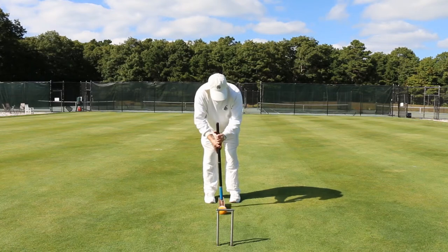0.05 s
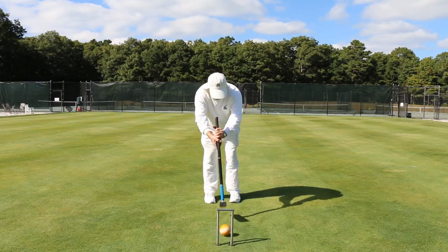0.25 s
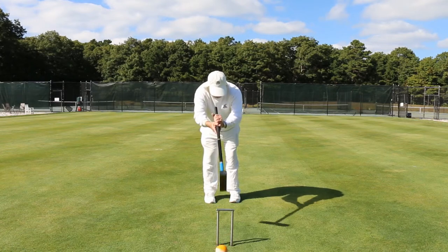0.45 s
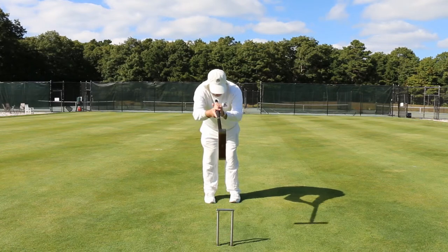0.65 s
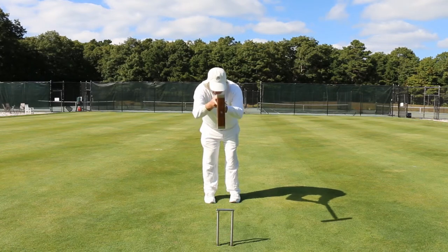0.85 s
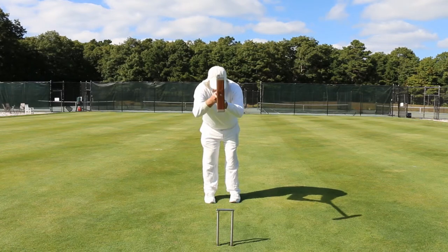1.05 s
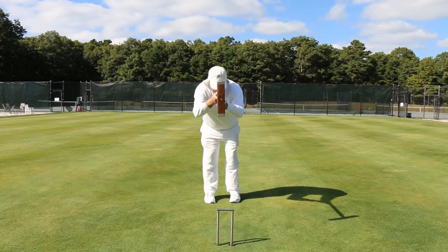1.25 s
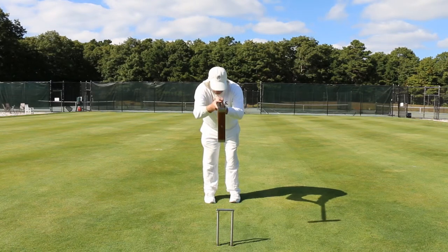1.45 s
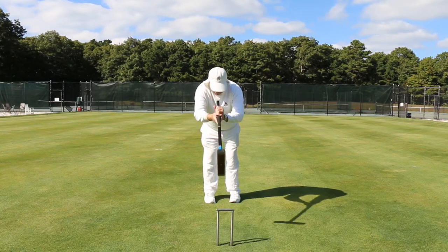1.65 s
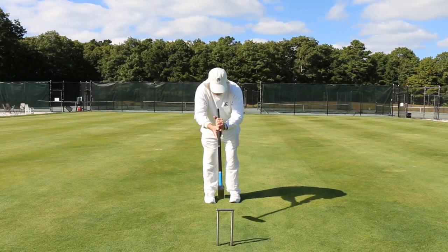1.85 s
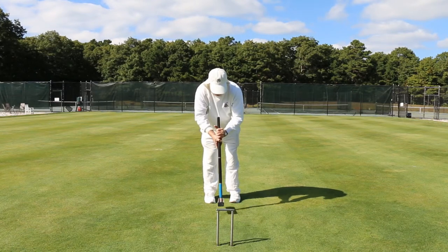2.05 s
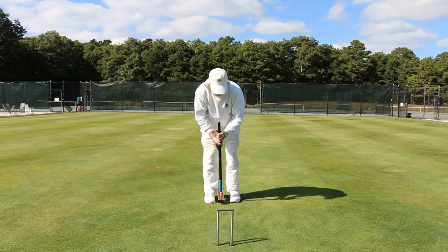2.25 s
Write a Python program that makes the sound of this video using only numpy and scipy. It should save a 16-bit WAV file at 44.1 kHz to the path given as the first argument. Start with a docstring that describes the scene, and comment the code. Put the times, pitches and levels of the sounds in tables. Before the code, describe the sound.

A faint bird whistle, then one abrupt, distorted wooden clack of mallet against ball; afterwards only a soft outdoor wash, small husky bird notes to the right, microphone hiss and a thin high electric whine.

```python
"""An open lawn: a wooden mallet strikes a hard ball a few metres from a camera whose input overloads.
Decaying wood modes, a crack of noise, a ground reflection and a dull echo make the knock.
Far traffic and breeze in trees are a soft wash of shaped noise. A bird whistles a pure, wavering tone;
another chatters to the right in short falling notes, husky with noise, amid a haze at their pitch.
The camera adds microphone hiss and a thin electric whine throughout."""
import sys
import numpy as np
from scipy import signal
from scipy.io import wavfile
from scipy.ndimage import uniform_filter1d

SR = 44100
rng = np.random.default_rng(int(sys.argv[2]) if len(sys.argv) > 2 else 0)


def volts_from_db(level):
    """Convert decibel levels to linear amplitude ratios."""
    exponent = np.asarray(level, float) / 20
    return 10 ** exponent


def store_pcm(level_fs):
    """Save levels as 16-bit WAV."""
    pcm = np.round(np.clip(level_fs, -1, 1) * 32767).astype(np.int16)
    wavfile.write(sys.argv[1], SR, np.atleast_2d(pcm).T)


N = 101429  # length [samples]

# Far traffic and breeze, relative spectrum: (frequency [Hz], density [dB per Hz])
WASH_SPECTRUM = [(15, -37), (25, -18.5), (75, -1.5), (115, -4.5), (200, -1), (290, -7), (390, -1.5),
                 (520, -6.5), (680, 0), (890, -5), (1200, -7), (1690, -9), (2530, -10.5), (7400, -15.5),
                 (9620, -20), (16300, -120)]
# Likeness of the wash at left and right: (frequency [Hz], correlation [-1 to 1])
WASH_LIKENESS = [(60, 0.96), (180, 0.91), (550, 0.66), (1650, 0.25), (4970, 0.17), (15000, 0.088)]
# Stereo lean of the wash: (frequency [Hz], left minus right [dB])
WASH_LEAN = [(60, 0.5), (110, 1), (200, 0), (380, -1.5), (700, -0.5), (1290, -1.5), (2380, -1),
             (4400, -0.5), (8120, -0.5), (15000, 0.0)]
# Microphone hiss, relative spectrum: (frequency [Hz], density [dB per Hz])
HISS_SPECTRUM = [(3000, -37), (6000, -10), (8500, -2.5), (11000, -0.5), (14000, -5), (16000, -9.5)]
# Likeness of the hiss at left and right: (frequency [Hz], correlation [-1 to 1])
HISS_LIKENESS = [(1000, .15), (16000, 0.12)]
# Stereo lean of the hiss: (frequency [Hz], left minus right [dB])
HISS_LEAN = [(1000, .2), (16000, .2)]
# Course of the whistled note: (time [s], pitch [Hz], rms level before panning [dB])
WHISTLE_COURSE = [(0.0, 3609, -50), (0.008, 3586, -58), (0.024, 3595, -49.5), (0.076, 3586, -55.5),
                  (0.096, 3592, -47), (0.132, 3581, -47.5), (0.146, 3576, -67), (0.168, 3559, -61),
                  (0.19, 3617, -65)]
# Modes of mallet head and ball: (frequency [Hz], level at the start of decay [dB], t60 [s],
# sign toward the listener [+1 or -1], left minus right [dB])
WOOD_MODES = [(345, -4.3, .007, 1, -4.9), (636, 10.7, .0056, -1, -8.9), (842, 15.8, .0215, 1, -6.2),
              (1022, -11.7, .031, -1, -4), (1146, 4.7, .01, -1, -2.6), (1295, 3.4, .0091, -1, -1.6),
              (1552, 16.9, .0093, -1, -.1), (1672, 16.5, .0154, 1, -.7), (1998, 4.6, .008, 1, .4),
              (2438, -4.1, .018, -1, -.6), (3321, 5.6, .0175, 1, -2.2), (3389, -6, .0306, -1, -2),
              (3402, -25, .09, -1, -1), (4504, -.9, .0045, 1, -6)]
# Chattered notes: (start [s], length [s], mid-note pitch [Hz], mid-note rms level before panning [dB],
# huskiness [0-1])
CHATTER_NOTES = [(0.966, 0.012, 1993, -37, 0), (1.076, 0.023, 2036, -40, 0.27), (1.176, 0.03, 1885, -48, 1),
                 (1.28, 0.034, 2072, -46.5, 0.76), (1.39, 0.011, 1900, -44.5, 0.7),
                 (1.393, 0.014, 2264, -47.5, .5), (1.486, 0.0145, 2280, -46, 0.5),
                 (1.504, .014, 1874, -49, .7), (1.577, 0.029, 2080, -47.5, 0.7),
                 (1.666, 0.026, 2263, -44, 0.44), (1.738, .025, 1900, -48, 0.6)]
# Haze at the pitch of the chatter: (time [s], level, 3 dB under the rms [dB])
HAZE_COURSE = [(1.1, -70), (1.3, -65), (1.5, -57.5), (1.68, -49.5), (1.85, -56.5), (2.0, -74)]

WHINE_HZ, WHINE_DB, WHINE_PAN_DB = 7867.13, -52.5, 4
FLIPS_PER_S, FLIP_S, FLIP_SOFTNESS = 29.97, .027, .1  # FLIP_S: moment of one sign flip
WASH_DB, WASH_PATCH_DB, WASH_SWELL_DB = -43.5, 0.74, -0.23
HISS_DB, HISS_PATCH_DB, HISS_SWELL_DB = -58, 0.48, 0.25
WHISTLE_PAN_DB = -8.5  # left minus right
BLOW_S, CONTACT_S = .203232, .000822  # moment and length of the contact
CRACK_DB, CRACK_T60_S, CRACK_HZ = -23, .006, 5140  # noise level before the highpass
GROUND_S, GROUND_DB = .001213, -3.7  # the soft lawn returns the knock upside down
ECHO_S, ECHO_DB, ECHO_HZ = .013, -37, 1100  # a dull echo off something near
CHATTER_FALL_HZ_PER_S, CHATTER_PAN_DB, HUSK_HZ = 1500, -4, 250
CHATTER_ECHO_DB, CHATTER_ECHO_T60_S = -13.5, 1  # the trees throw it back
HAZE_LOW_HZ, HAZE_HIGH_HZ = 1400, 2460
TOP_HZ = 10400  # the input rounds off the treble


def evened(x):
    """Scales a signal to an rms of 1."""
    return x / np.sqrt(np.mean(x ** 2) + 1e-20)


def read(points, hz):
    """Reads a table between its points along a logarithmic frequency axis."""
    f, value = np.transpose(points)
    return np.interp(np.log(hz + 1), np.log(f + 1), value)


def pan(x, left_db):
    """Places a sound by level: left minus right in dB."""
    return x * volts_from_db([[left_db / 2], [-left_db / 2]])


def add(mix, s, sound):
    """Adds a sound into the mix from second s, cut off at the end."""
    part = mix[..., round(s * SR):][..., :sound.shape[-1]]
    part += sound[..., :part.shape[-1]]


def filtered(x, hz, kind):
    """Butterworth filter with gentle slopes."""
    return signal.sosfilt(signal.butter(2, hz, kind, fs=SR, output="sos"), x)


def whine():
    """A steady tone whose sign flips with every picture frame."""
    t = np.arange(N) / SR
    flips = np.tanh(np.sin(np.pi * FLIPS_PER_S * (t - FLIP_S)) / FLIP_SOFTNESS)
    tone = np.sin(2 * np.pi * WHINE_HZ * t)
    return pan(np.sqrt(2) * volts_from_db(WHINE_DB) * flips * tone, WHINE_PAN_DB)


def noise(spectrum, likeness, lean, patch_db, swell_db):
    """Random short-time spectra with drifting patches and a slow swell; the mid has an rms of 1."""
    frames, hz = N // 256 + 5, np.fft.rfftfreq(1024, 1 / SR)
    a, b, c, d, patches = rng.standard_normal((frames, 513, 5)).T
    patches = uniform_filter1d(patches, size=10, axis=0)  # along frequency
    patches = evened(uniform_filter1d(patches, size=14, axis=1))  # along time
    swell = evened(uniform_filter1d(rng.standard_normal(frames), size=40))
    same = read(likeness, hz)[:, None]
    left = a + 1j * b
    right = same * left + np.sqrt(1 - same ** 2) * (c + 1j * d)
    half_lean = read(lean, hz)[:, None] / 2
    level_db = read(spectrum, hz)[:, None] + patch_db * patches + swell_db * swell
    z = np.array([left, right]) * volts_from_db(level_db + np.array([half_lean, -half_lean]))
    x = signal.istft(z, nperseg=1024, noverlap=768)[1][:, :N]
    return x / np.sqrt(np.mean(x.mean(0) ** 2))


def wash():
    """Far traffic and breeze in trees: broad noise, much alike at both sides in the bass."""
    shaped = noise(WASH_SPECTRUM, WASH_LIKENESS, WASH_LEAN, WASH_PATCH_DB, WASH_SWELL_DB)
    return volts_from_db(WASH_DB) * shaped


def hiss():
    """Microphone hiss: treble noise, nearly independent at left and right."""
    shaped = noise(HISS_SPECTRUM, HISS_LIKENESS, HISS_LEAN, HISS_PATCH_DB, HISS_SWELL_DB)
    return volts_from_db(HISS_DB) * shaped


def whistle():
    """A pure tone of nearly level pitch and wavering loudness that ends early."""
    t = np.arange(N) / SR
    s, hz, db = np.transpose(WHISTLE_COURSE)
    tone = np.sin(2 * np.pi * np.cumsum(np.interp(t, s, hz)) / SR)
    level = volts_from_db(np.interp(t, s, db, right=-120))
    return pan(np.sqrt(2) * level * tone, WHISTLE_PAN_DB)


def ring(start):
    """The modes build up during the contact and ring out; a short crack of noise joins them."""
    t = np.maximum(np.arange(N) / SR - start, 0)
    rise = np.sin(np.pi / 2 * np.minimum(t / CONTACT_S, 1)) ** 2
    modes = np.zeros((2, N))
    for hz, db, t60, sign, left_db in WOOD_MODES:
        mode = sign * volts_from_db(db - 60 * t / t60) * np.sin(2 * np.pi * hz * t)
        modes += pan(mode, left_db)
    crack = filtered(rng.standard_normal(N), CRACK_HZ, "highpass")
    return rise * (modes + volts_from_db(CRACK_DB - 60 * t / CRACK_T60_S) * crack)


def knock():
    """Direct sound, the inverted ground reflection and one later, dull echo."""
    heard = ring(BLOW_S) - volts_from_db(GROUND_DB) * ring(BLOW_S + GROUND_S)
    out = heard.copy()
    add(out, ECHO_S, volts_from_db(ECHO_DB) * filtered(heard, ECHO_HZ, "lowpass"))
    return out


def dying_noise(t60, size):
    """Two channels of noise that die away; the left has energy 1."""
    tail = rng.standard_normal((2, size)) * volts_from_db(-60 * np.arange(size) / SR / t60)
    return tail / np.linalg.norm(tail[0])


def chatter():
    """Short, slightly falling notes about ten a second; the huskier, the more noise smears the tone."""
    out = np.zeros(N)
    husk = evened(filtered(rng.standard_normal(N), HUSK_HZ, "lowpass"))
    for s, length, hz, db, rough in CHATTER_NOTES:
        u = np.arange(0, length, 1 / SR) / length  # 0 to 1 through the note
        turns = np.cumsum(hz + CHATTER_FALL_HZ_PER_S * length * (.5 - u)) / SR
        voice = np.sqrt(1 - rough ** 2) + rough * husk[round(s * SR):][:len(u)]
        envelope = np.sin(np.pi * u) ** .4
        add(out, s, np.sqrt(2) * volts_from_db(db) * envelope * voice * np.sin(2 * np.pi * turns))
    tail = dying_noise(CHATTER_ECHO_T60_S, size=22050)
    echo = signal.fftconvolve(out[None], tail, axes=1)[:, :N]
    return pan(out, CHATTER_PAN_DB) + volts_from_db(CHATTER_ECHO_DB) * echo


def haze():
    """A band of noise at the pitch of the chatter that swells and fades, independent at left and right."""
    s, db = np.transpose(HAZE_COURSE)
    band = filtered(rng.standard_normal((2, N)), [HAZE_LOW_HZ, HAZE_HIGH_HZ], "bandpass")
    level = volts_from_db(np.interp(np.arange(N) / SR, s, db, left=-120, right=-120))
    return np.sqrt(2) * level * evened(band)


def scene():
    """Wash of the outdoors, birds and knock, as they reach the microphone."""
    return wash() + whistle() + knock() + chatter() + haze()


def low_pass(x):
    """Removes everything above the highest recorded frequency."""
    return signal.sosfilt(signal.butter(12, 16160, fs=SR, output="sos"), x)


def record(dry):
    """The camera input clips hard at full scale and softens the treble; hiss and whine join after it."""
    overloaded = np.clip(dry, -1, 1)
    softened = filtered(overloaded, TOP_HZ, "lowpass")
    mix = softened + hiss() + whine()
    return low_pass(mix)


dry = scene()
out = record(dry)
store_pcm(out)
```